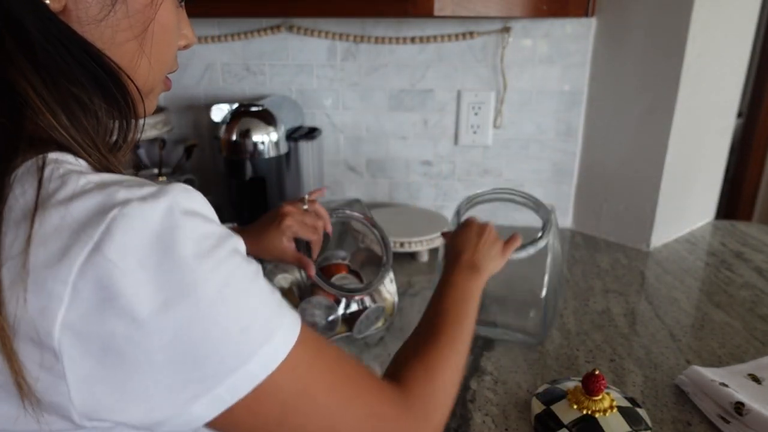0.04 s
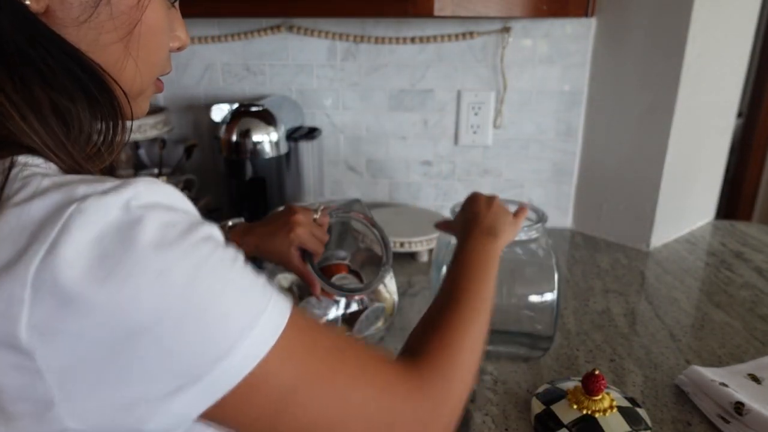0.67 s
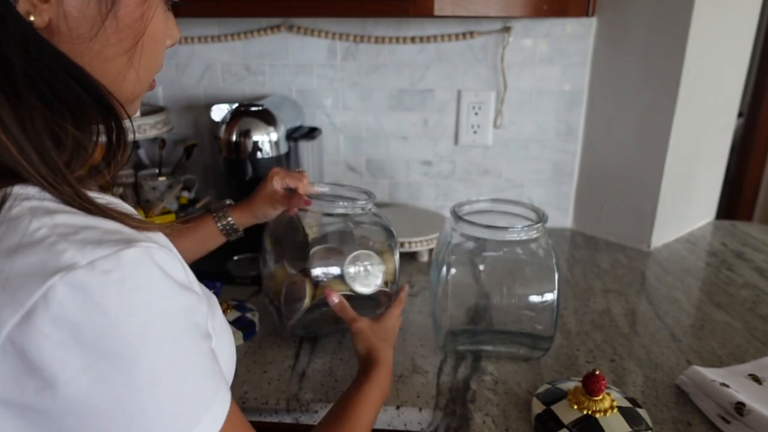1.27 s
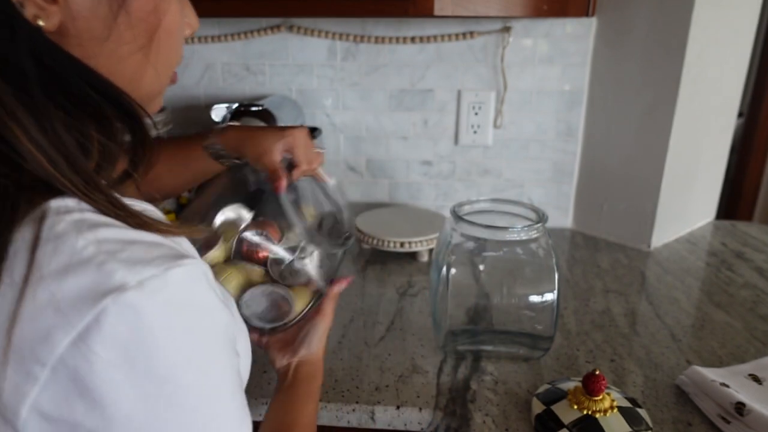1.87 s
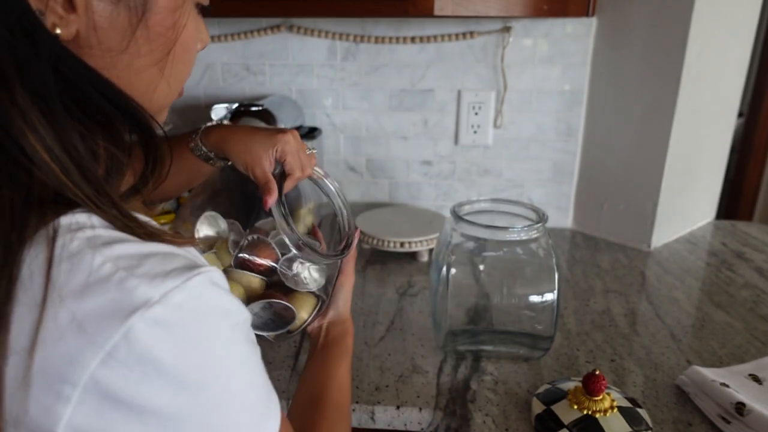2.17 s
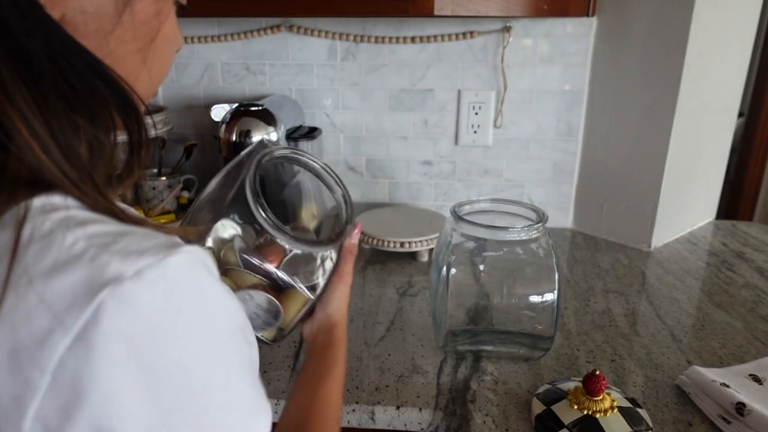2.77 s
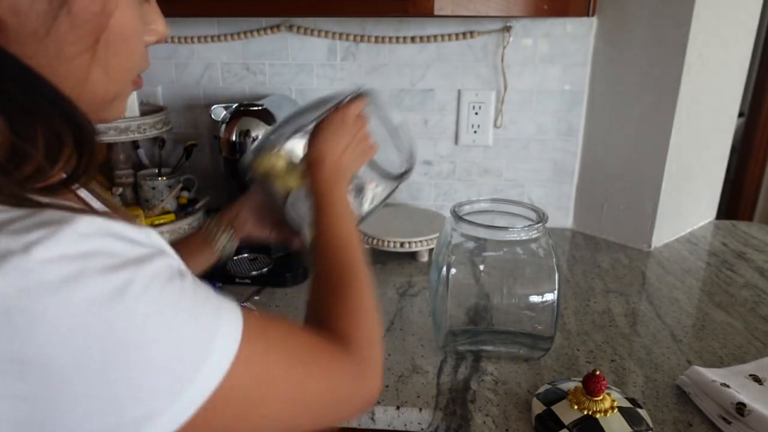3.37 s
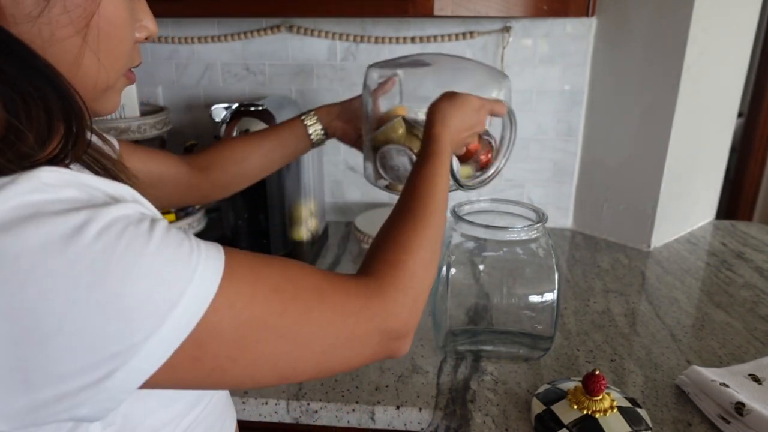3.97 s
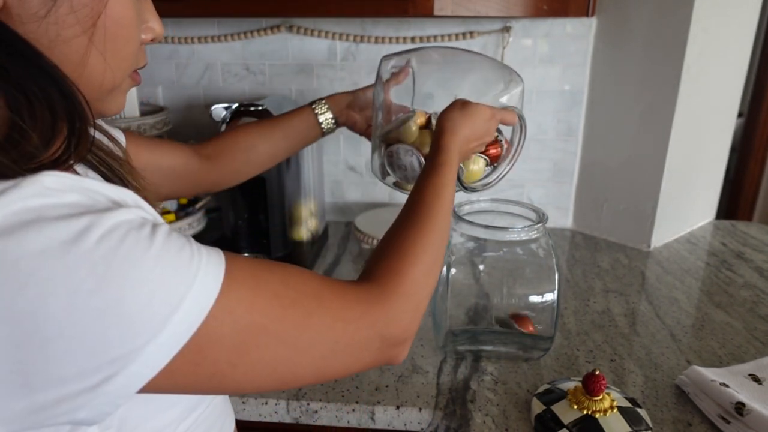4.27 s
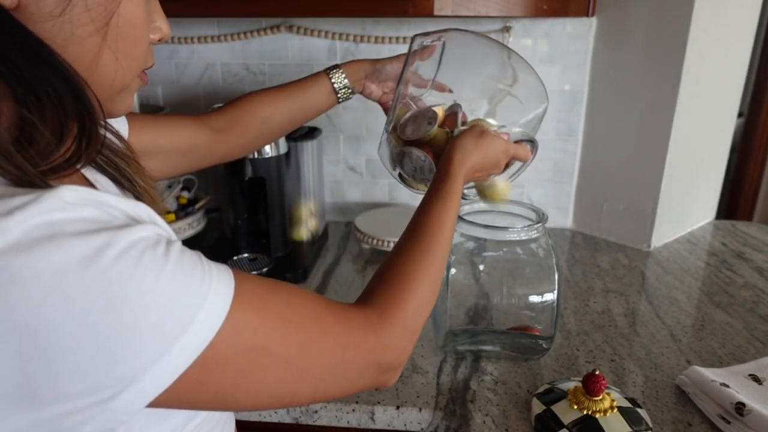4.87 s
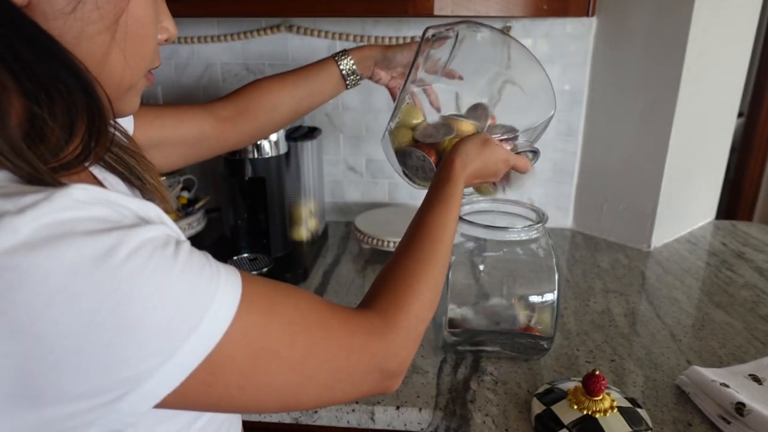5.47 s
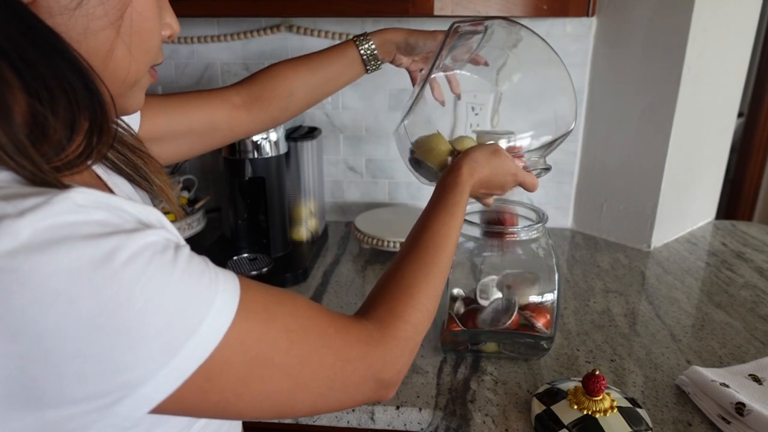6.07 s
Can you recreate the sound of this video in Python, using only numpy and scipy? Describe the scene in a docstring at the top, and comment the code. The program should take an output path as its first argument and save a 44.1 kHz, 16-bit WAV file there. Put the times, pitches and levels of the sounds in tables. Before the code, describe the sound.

A glass jar knocks onto a stone counter, then coffee capsules rattle inside another jar and clatter into the empty one.

```python
"""Coffee capsules poured between glass jars

An empty jar is stood on a stone counter and rocks on its base. A full one is slid, bumped and tipped:
its capsules clack around inside, then drop in bursts into the standing jar. Each hit is a short crack
of noise plus ringing glass. The small room echoes a little, and an appliance hums faintly."""
import sys
import numpy as np
from scipy import signal
from scipy.io import wavfile
from scipy.ndimage import uniform_filter1d, minimum_filter1d

SR = 44100
rng = np.random.default_rng(int(sys.argv[2]) if len(sys.argv) > 2 else 0)


def master(y):
    """Save y as 16-bit WAV."""
    cut = np.clip(np.atleast_2d(y).T, -1, 1)
    pcm = np.round(cut * 32767)  # scale
    wavfile.write(sys.argv[1], SR, pcm.astype(np.int16))


N = 274958
TIME = np.arange(N) / SR


def amp(db):
    """Turns decibels into a gain."""
    return 10 ** (np.asarray(db) / 20)


def unit(x):
    """Scales a signal to an average power of 1."""
    return x / np.sqrt(np.mean(x ** 2) + 1e-20)


def fade(t, t60):
    """A fade that falls 60 dB in t60 seconds."""
    return np.exp(-np.log(1000) * t / t60)


def read(points, hz):
    """Looks up a frequency in a table, blending between rows."""
    freqs, values = np.transpose(points)
    return np.interp(np.log(hz + 1), np.log(freqs + 1), values)


def add(mix, s, sound):
    """Mixes in a sound, starting at s seconds."""
    part = mix[max(round(s * SR), 0):][:len(sound)]
    part += sound[:len(part)]


def coloured(x, colour, tilt=0, ripple_db=0):
    """Filters x by a colour table, a brightness tilt (capped at 6 dB/octave) and random peaks."""
    hz = abs(np.fft.fftfreq(len(x), 1 / SR))
    ripple = np.interp(hz, np.geomspace(800, 17000, 44), rng.standard_normal(44)) * (hz > 800)
    octaves = np.log2(np.maximum(hz, 700) / 1000)
    db = read(colour, hz) + np.clip(tilt, -6, 6) * octaves + ripple_db * ripple
    response = np.exp(np.conj(signal.hilbert(np.log(amp(db)))))  # rings after a hit, not before
    return np.fft.ifft(np.fft.fft(x) * response).real


def ringing(notes, t60, t):
    """One fading sine for each note of the glass; t60 applies at 2 kHz, higher notes die sooner."""
    hz, db = np.transpose(notes)[:, :, None]
    size = amp(db) / np.sqrt(np.sum(amp(db) ** 2) / 2)
    return size * np.sin(2 * np.pi * hz * t) * fade(t, t60 * (2000 / hz) ** .25)


def struck(sines):
    """The spot where glass is hit decides how strongly each note answers."""
    strengths = unit(rng.uniform(0.037, 1, len(sines)))
    return (strengths * rng.choice([-1, 1], len(sines))) @ sines


def hits(rows, colour, notes, ring_db, ring_t60, note_t60, crack_s, rattle_db, rattle_t60, ripple_db):
    """Each hit is a crack, a rattle of echoes in the jar, ringing glass and one main note."""
    t, out = np.arange(2 ** 15) / SR, np.zeros(N)
    sines = ringing(notes, ring_t60, t)
    burst = np.exp(-t / crack_s) + amp(rattle_db) * fade(t, rattle_t60)
    for s, db, tilt, note_hz, note_db in rows:
        contact = coloured(burst * rng.standard_normal(len(t)), colour, tilt, ripple_db)
        contact /= np.sqrt(np.mean(contact[:SR // 150] ** 2))  # the first 7 ms set the level
        note = ringing([(note_hz, 0)], note_t60, t)[0]
        add(out, s, amp(db) * (contact + amp(ring_db) * struck(sines) + amp(note_db) * note))
    return out


def chatter(colour, notes, per_s, spread_db, grain_s, ring_db, ring_t60, ripple_db=0, spots=12):
    """Many tiny taps at random times, on spots that each have their own colour and ring."""
    t, out = np.arange(2 ** 14) / SR, np.zeros(N)
    sines = ringing(notes, ring_t60, t)
    for _ in range(spots):
        burst = np.exp(-t / grain_s) * rng.standard_normal(len(t))
        grain = unit(coloured(burst, colour, ripple_db=ripple_db))
        sizes = amp(spread_db * np.minimum(rng.exponential(1, N), 3)) * rng.choice([-1, 1], N)
        clicks = sizes * (rng.random(N) < per_s / spots / SR)
        out += signal.oaconvolve(clicks, grain + amp(ring_db) * unit(struck(sines)))[:N]
    return unit(out)


def hollow(x, air_hz, width_hz, boost_db):
    """The air in a jar booms through its mouth at one low note."""
    return x + amp(boost_db) * signal.lfilter(*signal.iirpeak(air_hz, air_hz / width_hz, SR), x)


def move(start, rise, hold, db, t60):
    """Loudness of one movement: it gathers speed, keeps it and dies away."""
    t = TIME - start
    return amp(db) * np.clip(t / rise, 0, 1) * fade(np.maximum(t - rise - hold, 0), t60)


def stirred(rows, db, rise_s, t60, tilt_weight):
    """Loudness of the small motion after each hit; brighter hits stir up more."""
    t, power = TIME[:SR], np.zeros(N)
    swell = (1 - np.exp(-t / rise_s)) * fade(t, t60)
    for s, hit_db, tilt, *_ in rows:
        add(power, s, (amp(hit_db + tilt * tilt_weight + db) * swell) ** 2)
    return np.sqrt(power)


def with_note(rows, hz, share_db, db_per_tilt):
    """Gives hits a main note whose share depends on their brightness."""
    return [(s, db, tilt, hz, share_db + db_per_tilt * tilt) for s, db, tilt in rows]


# colour of the room's air noise (frequency [Hz], level [dB])
AIR_COLOUR = [(25, -38), (50, -26), (100, -2.5), (280, -4), (450, -10), (700, -13.5), (1400, -26),
              (3000, -29), (8000, -36.5), (16000, -48)]
# the hum swells and sinks (time [s], level [dB])
HUM_LEVELS = [(2.2, -53.5), (3.4, -48), (4.7, -54.5)]
def room_tone():
    """Low, steady air noise and the wavering hum of an appliance."""
    waver = unit(np.interp(TIME, np.linspace(0, TIME[-1], 70), rng.standard_normal(70)))
    hum_hz = 791 + 2.9 * waver
    hum = np.sqrt(2) * np.sin(2 * np.pi * np.cumsum(hum_hz) / SR)
    hum_gain = amp(np.interp(TIME, *np.transpose(HUM_LEVELS)))
    air = unit(coloured(rng.standard_normal(N), AIR_COLOUR))
    return amp(-42.5) * air + hum_gain * hum


# how long the room echoes (frequency [Hz], time to fall 60 dB [s])
ECHO_TIMES = [(150, 0.83), (800, 0.44), (3000, 0.46), (8000, 0.38), (15000, 0.2)]
def echoes(x):
    """Sound bounces off counter, tiles and walls; the lows linger longest."""
    per_s, first_s = 3000, .003
    bounces = rng.choice([-1., 1.], SR) * (rng.random(SR) < per_s / SR) * (TIME[:SR] > first_s)
    hz, t, bands = signal.stft(bounces, SR, nperseg=256)
    tail = signal.istft(bands * fade(t, read(ECHO_TIMES, hz)[:, None]), SR)[1]
    return signal.fftconvolve(x, tail / np.linalg.norm(tail))[:N]


# a hand or sleeve slides over the glass (start [s], rise [s], hold [s], level [dB])
SLIDES = [(.15, .04, .1, -50), (.72, .11, .26, -34.5)]
# colour of skin or cloth rubbing on glass (frequency [Hz], level [dB])
SLIDE_COLOUR = [(1500, -25), (5200, -17.5), (8000, -2.5), (12500, -2.5), (16000, -20)]
def sliding_hand():
    """A hand or sleeve slides over the glass with a smooth, high swish."""
    motion = sum(move(*row, t60=0.13) for row in SLIDES)
    return motion * unit(coloured(rng.standard_normal(N), SLIDE_COLOUR, ripple_db=2.5))


# hands tap the glass (time [s], level [dB], brightness [dB/octave])
TAPS = [(0.626, -28.5, -10), (1.031, -32.5, 0.5), (2.804, -17.5, 2), (3.022, -34.5, 2), (3.155, -31.5, 4.5),
        (3.209, -34.5, 1), (3.257, -39, 13)]
# colour of a tap (frequency [Hz], level [dB])
TAP_COLOUR = [(100, -31), (1200, -15), (2300, -1), (3200, -4.5), (5000, 5), (6200, -0.5), (10000, -5),
              (16000, -13)]
# notes of the held jar's rim (frequency [Hz], level [dB])
RIM_NOTES = [(1975, -3.5), (2530, -6), (3596, -2), (4204, 1), (4947, 7), (5080, -6), (5852, -12), (6724, 4),
             (7924, 6), (9001, 8), (11220, -3), (13310, -4)]
def hand_clinks():
    """Small, hard taps wake only the high notes of the glass."""
    taps = with_note(TAPS, hz=5120, share_db=-13.5, db_per_tilt=0.3)
    return hits(taps, TAP_COLOUR, RIM_NOTES, ring_db=-11.5, ring_t60=0.38, note_t60=0.063,
                crack_s=0.011, rattle_db=-10, rattle_t60=0.09, ripple_db=2)


# a jar is bumped (time [s], level [dB], brightness [dB/octave], main note [Hz], its share [dB])
JAR_BUMPS = [(0.829, -20.5, 0, 447, -5), (1.304, -9, 1, 1043, -6.5), (1.329, -12, -3.5, 279.7, -8.5),
             (4.921, -44, -7, 237.6, 15), (5.264, -16, -7, 297, -11.5), (5.300, -17.5, -21, 220, -16.5)]
# colour of heavy glass hitting stone (frequency [Hz], level [dB])
THUD_COLOUR = [(25, -74), (70, -56), (130, -16.5), (230, -5.5), (450, -1), (720, 2.5), (1150, -3.5),
               (1900, -24), (3100, -29), (3800, -19), (6000, -34), (10000, -40), (16000, -55)]
# notes of the held jar (frequency [Hz], level [dB])
HELD_NOTES = [(925, -1.5), (1037, 2), (1085, 3.5), (1180, -6), (1570, 0.5), (1760, 1), (1975, 0),
              (2200, -17), (2555, -1.5), (2632, 0), (3640, 3), (3880, -2.5), (4990, -11)]
def bumped_jar():
    """A jar muffled by hands or contents thuds and barely rings."""
    return hits(JAR_BUMPS, THUD_COLOUR, HELD_NOTES, ring_db=-14, ring_t60=0.13, note_t60=0.21,
                crack_s=0.0013, rattle_db=-11, rattle_t60=0.3, ripple_db=4)


# the empty jar meets the counter (time [s], level [dB], brightness [dB/octave], rocking time [s])
BASE_KNOCKS = [(0.029, -16.5, -1, .032), (0.148, -21, -2, .01), (0.191, -17.5, 1, .01),
               (0.340, -7.5, 0.8, .095), (0.572, -17.5, -7, .01), (0.584, -15.5, -3, .01),
               (0.619, -15, -0.6, .01)]
def base_strikes(gap_s=.02, loss_db=2.5):
    """Each knock repeats, ever weaker, for as long as the jar rocks."""
    return [(s + k * gap_s, db - k * loss_db, tilt)
            for s, db, tilt, length in BASE_KNOCKS for k in range(int(length / gap_s) + 1)]


# notes of the empty jar (frequency [Hz], level [dB])
EMPTY_NOTES = [(447, -4.5), (570, -0.5), (635, 5), (706, 3.5), (770, 6), (827, 1), (1028, -2), (1114, 2),
               (1240, 5), (2010, -3), (2110, -2), (2230, -33), (2740, -9.5), (2810, -2), (3540, -6),
               (3747, -27), (4247, -26), (4410, -12), (4770, -10), (4953, -7), (5093, -33), (5380, -26),
               (6089, -16.5), (6700, -13.5), (7084, -19), (10100, -25)]
def rocking_jar():
    """The empty jar knocks and rolls on its base, and the air inside booms."""
    strikes = with_note(base_strikes(), hz=253.4, share_db=-21, db_per_tilt=-2.5)
    knocks = hits(strikes, THUD_COLOUR, EMPTY_NOTES, ring_db=-3, ring_t60=0.18, note_t60=0.16,
                  crack_s=0.005, rattle_db=-6, rattle_t60=0.19, ripple_db=4)
    roll = move(start=-0.84, rise=0.47, hold=0.79, db=-26, t60=0.58)
    roll += stirred(strikes, db=-1, rise_s=0.011, t60=0.073, tilt_weight=0.67)
    roll *= chatter(THUD_COLOUR, EMPTY_NOTES, per_s=1700, spread_db=-4.5, grain_s=0.0039,
                    ring_db=-5, ring_t60=0.17, ripple_db=1)
    return hollow(knocks + roll, air_hz=265.3, width_hz=10, boost_db=10)


def singing_wall(wall_hz=2811):
    """The chattering base keeps the jar's wall singing, with one note standing out."""
    high_notes = [(hz, db) for hz, db in EMPTY_NOTES if hz > 2000]
    shimmer = stirred(base_strikes(), db=-13, rise_s=0.02, t60=0.25, tilt_weight=3.1)
    shimmer *= chatter(THUD_COLOUR, high_notes, per_s=400, spread_db=1, grain_s=0.0038,
                       ring_db=9, ring_t60=0.33)
    note = stirred(base_strikes(), db=-7.5, rise_s=0.041, t60=0.23, tilt_weight=1)
    note *= chatter(THUD_COLOUR, [(wall_hz, 0)], per_s=560, spread_db=2.5, grain_s=.002,
                    ring_db=16, ring_t60=0.24, spots=2)
    return shimmer + note


# loudest clacks in the held jar (time [s], level [dB], brightness [dB/octave], main note [Hz])
CLACKS = [(1.111, -29, 0, 4600), (1.21, -28.5, 10, 5680), (1.238, -23.5, -9, 4130), (1.268, -19, 0.5, 9630),
          (1.306, -19, -3.5, 2596), (1.336, -18, -8, 1046), (1.388, -26.5, 7, 1010),
          (1.885, -17.5, -2, 1890), (1.897, -21.5, 8, 905), (1.943, -24, 7.5, 976), (1.997, -19, 4, 5200),
          (2.082, -27, -2, 5200), (2.179, -23.5, -1.5, 1240), (3.699, -29, 16, 5240),
          (3.785, -21.5, 1.5, 4100), (3.828, -21, 1.5, 9600), (3.875, -17.5, -1, 1073),
          (3.919, -16.5, -2, 3740), (3.962, -13.5, -1, 1128), (3.975, -21, 9, 3700),
          (4.002, -11.5, -2.5, 1106), (4.054, -17.5, -5, 2020), (4.119, -14.5, 2.5, 3580),
          (4.138, -19, -3.5, 2180), (4.232, -15, 2, 9820), (4.963, -24.5, 6, 1166), (4.98, -21, -1.8, 3920),
          (5.049, -25.5, -1, 4750), (5.121, -16, -1.5, 1186), (5.249, -21, 8, 5140),
          (5.361, -16.5, 11, 8850), (5.436, -14.5, 3, 3570), (5.454, -16, 0, 3380),
          (5.739, -17.5, -3, 1270), (5.853, -14, 0.5, 1990)]
# the heap shifts as the jar tilts (start [s], rise [s], hold [s], level [dB])
HEAP_SHIFTS = [(1.085, 0.16, 0.12, -27.5), (1.457, 0.011, 0.0091, -34), (1.748, 0.071, 0.12, -44),
               (1.867, 0.03, 0.18, -28), (2.218, 0.035, .12, -43.5), (3.09, 0.046, 0.2, -50),
               (3.666, 0.26, .3, -25.5), (4.807, 0.19, 0.023, -36), (5.254, 0.046, 0.045, -28),
               (5.426, 0.057, 0.17, -26), (5.73, 0.27, 0.13, -21.5)]
# colour of a capsule's thin shell (frequency [Hz], level [dB])
SHELL_COLOUR = [(30, -66), (250, -11), (500, -10), (800, -3.5), (1060, 5), (1350, 0.5), (2000, 3.5),
                (3800, 5.5), (5200, 5), (6600, -2), (8600, 3), (11500, -5.5), (13500, -5.5), (16000, -13)]
def tumbling_capsules(note_db=-8):
    """Thin shells clack against the held jar and jostle each other."""
    rows = [(*row, note_db) for row in CLACKS]
    clacks = hits(rows, SHELL_COLOUR, HELD_NOTES, ring_db=-13.5, ring_t60=0.26, note_t60=0.14,
                  crack_s=0.0027, rattle_db=-5.5, rattle_t60=0.18, ripple_db=4.5)
    jostle = sum(move(*row, t60=0.41) for row in HEAP_SHIFTS)
    jostle *= chatter(SHELL_COLOUR, HELD_NOTES, per_s=480, spread_db=9, grain_s=0.019,
                      ring_db=-3.5, ring_t60=0.075, ripple_db=6.5)
    return hollow(clacks + jostle, air_hz=262.6, width_hz=8.2, boost_db=22.5)


# capsules land in the standing jar (time [s], level [dB], brightness [dB/octave], main note [Hz])
DROPS = [(4.348, -11.5, -1.5, 1217), (4.441, -20, -3.5, 1230), (5.158, -15.5, -4.5, 1240),
         (5.262, -12.5, -0.5, 1070), (5.466, -14, -1, 1770), (5.49, -16, 2.5, 2115),
         (5.562, -15, -1.5, 2115), (5.627, -19.5, -2.5, 2105), (5.748, -18.5, -4, 1210),
         (5.767, -12.5, -3, 2810), (5.814, -21, -3, 2144), (5.886, -18, -4, 1990),
         (5.995, -13.5, -2.5, 2690), (6.054, -15.5, -4, 2115), (6.08, -13.5, -0.5, 945),
         (6.154, -14.5, -1.5, 2685), (6.208, -13, -1, 2115)]
# notes of the standing jar with capsules in it (frequency [Hz], level [dB])
STANDING_NOTES = [(953, 11), (1007, 5), (1206, 7), (1250, 11.5), (1669, -15), (1787, 4.5), (1992, 2),
                  (2120, 4), (2277, -7), (2369, 11.5), (2509, -18), (2697, 9.5), (2830, -16), (3435, 6),
                  (3774, 3.5), (4027, -17), (4414, -5), (4996, 5.5), (5728, -3), (8253, -32)]
# colour of a landing (frequency [Hz], level [dB])
DROP_COLOUR = [(30, -43), (250, -9), (400, -5), (800, -14.5), (1200, -15.5), (1450, 1), (2500, -1),
               (4000, 1.5), (6500, -3.5), (8200, 1), (11500, -7), (13500, -7), (16000, -13)]
# colour of capsules settling on the bottom (frequency [Hz], level [dB])
SETTLE_COLOUR = [(100, -10), (220, 5), (290, -6), (400, -18.5), (600, 19), (1000, -7), (1600, -3.5),
                 (4000, -33), (16000, -53)]
def landing_capsules(bounce_s=.014, bounce_db=-7, note_db=-5.5, heap_from_s=5.2):
    """Each capsule lands on its rim, falls flat and skitters; later ones stir the growing heap."""
    strikes = [(s + k * bounce_s, db + k * bounce_db, tilt, hz, note_db)
               for s, db, tilt, hz in DROPS for k in range(2)]
    landings = hits(strikes, DROP_COLOUR, STANDING_NOTES, ring_db=-6.5, ring_t60=0.3, note_t60=0.18,
                    crack_s=0.0031, rattle_db=-6, rattle_t60=0.26, ripple_db=5)
    skitter = stirred(DROPS, db=-11, rise_s=0.033, t60=0.17, tilt_weight=1)
    skitter *= chatter(DROP_COLOUR, STANDING_NOTES, per_s=400, spread_db=15, grain_s=0.0029,
                       ring_db=-6, ring_t60=0.28, ripple_db=7, spots=8)
    onto_heap = [row for row in DROPS if row[0] > heap_from_s]
    settling = stirred(onto_heap, db=-13.5, rise_s=0.045, t60=0.71, tilt_weight=.3)
    settling *= chatter(SETTLE_COLOUR, STANDING_NOTES, per_s=300, spread_db=2.5, grain_s=0.0043,
                        ring_db=-5.5, ring_t60=0.65, ripple_db=7)
    return hollow(landings + skitter + settling, air_hz=276, width_hz=12, boost_db=12.5)


# how wide the room sounds (frequency [Hz], level of left minus right [dB])
ROOM_WIDTH = [(100, -30), (300, -18.5), (700, -9.5), (1500, -5.5), (3000, -4.5), (14000, -2.5)]
def scene():
    """Jars and capsules are nearly straight ahead; only the echoes and room tone are wide."""
    jars = rocking_jar() + bumped_jar() + singing_wall() + sliding_hand()
    capsules = tumbling_capsules() + landing_capsules()
    bass_cut = signal.butter(2, 105, "high", fs=SR)  # the lowest bass is trimmed from all direct sounds
    direct = signal.lfilter(*bass_cut, jars + capsules + hand_clinks())
    echo_gain = amp(-12)
    middle = direct + echo_gain * echoes(direct) + room_tone()
    wide = echo_gain * echoes(direct) + amp(1.5) * room_tone()
    side = coloured(wide, ROOM_WIDTH) - amp(-37) * direct
    return np.array([middle + side, middle - side])


def record(dry):
    """A quick limiter holds peaks at full scale, then a filter trims the highest treble."""
    allowed = 1 / np.maximum(abs(dry).max(0), 1)
    gain = uniform_filter1d(minimum_filter1d(allowed, size=129), size=129)
    low_pass = signal.firwin(401, 15900, window=("kaiser", 8), fs=SR)
    return signal.oaconvolve(dry * gain, low_pass[None], "same")


dry = scene()
out = record(dry)
master(out)
```